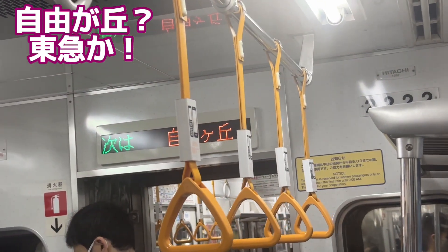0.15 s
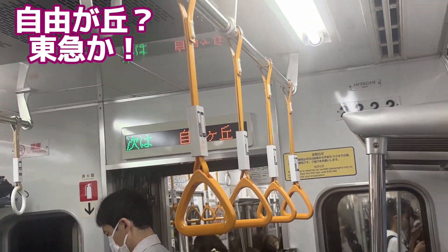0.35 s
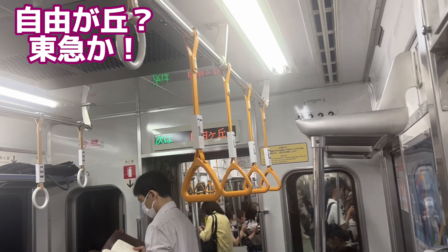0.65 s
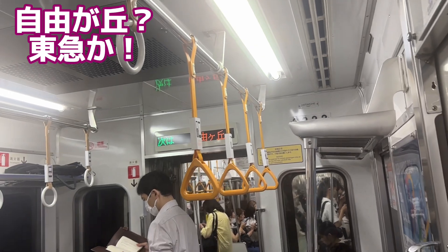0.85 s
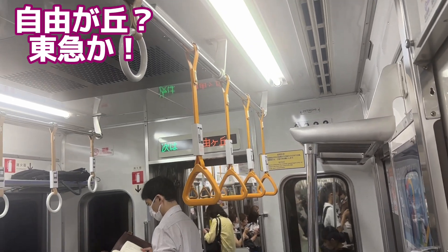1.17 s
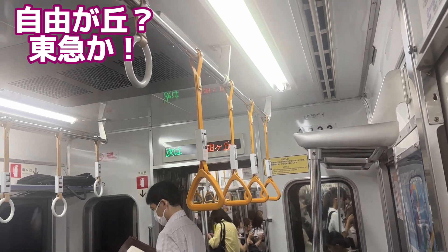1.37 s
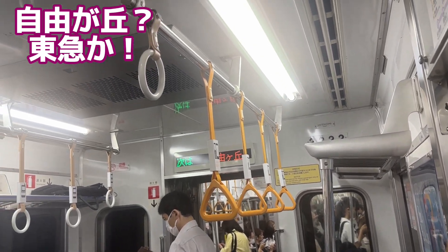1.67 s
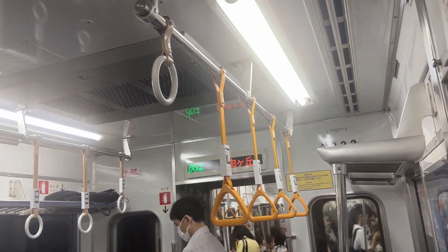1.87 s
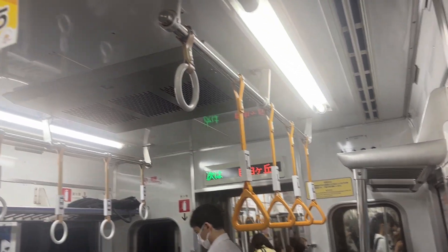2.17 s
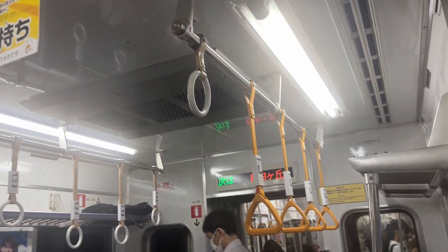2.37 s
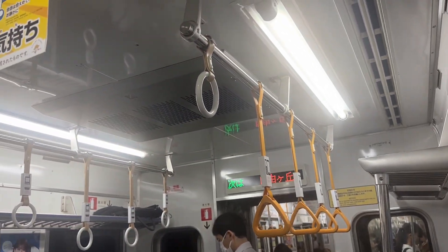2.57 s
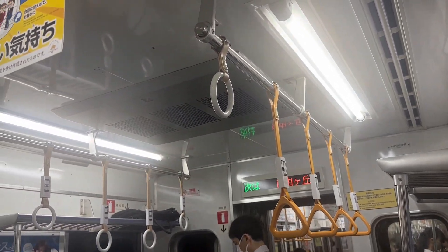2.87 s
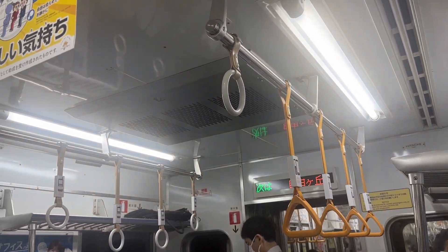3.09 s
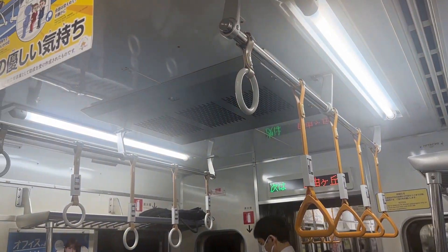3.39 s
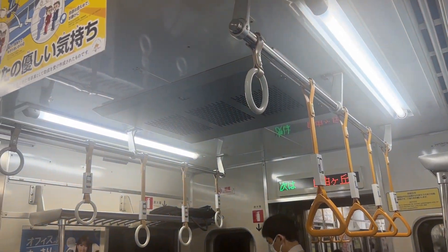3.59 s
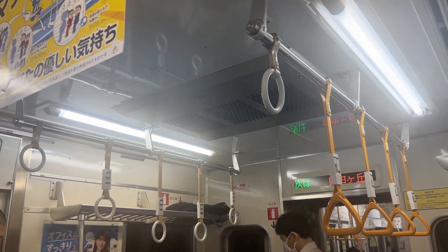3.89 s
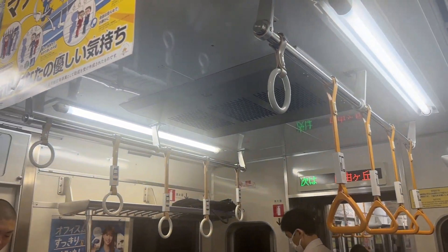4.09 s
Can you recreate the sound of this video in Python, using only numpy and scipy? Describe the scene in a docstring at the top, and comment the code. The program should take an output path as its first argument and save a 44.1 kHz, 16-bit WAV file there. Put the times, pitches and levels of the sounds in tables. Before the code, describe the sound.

Loud train interior in a tunnel: fluttering low wheel howl, rolling steel roar, body boom, faint rising motor whine and fan hum.

```python
"""Inside a subway car that gathers speed in a tunnel: from the start, wheels on rippled rail beat near 300 Hz
with overtones and ringing above, steel rolls with roar and hiss, the body rumbles and booms, motors and gears
whine on rising lines, and fans hum and rush. Near 0.1 s a valve lets out a puff of air; steel scuffs follow
(0.3 to 2.7 s), the howl's octave sings out (0.7 to 2.8 s) and a loose fitting ticks (1.0 to 1.7 s).
The howl flares and dips, and eases after 2.5 s on smoother track. Noise is shaped by resonance or colour."""
import sys
import numpy as np
from scipy import signal
from scipy.fft import rfft, irfft
from scipy.io import wavfile
from scipy.ndimage import uniform_filter1d

SR = 44100
rng = np.random.default_rng(int(sys.argv[2]) if len(sys.argv) > 2 else 0)


def int16_out(signal):
    """Quantize to a 16-bit WAV file."""
    q = np.round(np.clip(np.atleast_2d(signal).T, -1, 1) * 32767)
    wavfile.write(sys.argv[1], SR, q.astype(np.int16))


N = 186984


def from_db(db):
    """Level to amplitude: 20 dB is a factor of ten."""
    return 10 ** (np.asarray(db) / 20)


def rms_one(x):
    """Normalisation to unit root-mean-square amplitude."""
    return x / np.sqrt(np.mean(x ** 2) + 1e-20)


def seconds():
    """Uniform sampling: the time of each sample."""
    return np.arange(N) / SR


def bins():
    """Discrete Fourier analysis: the frequency of each bin, at least 1 Hz."""
    return np.maximum(np.arange(N // 2 + 1) * SR / N, 1)


def in_time(rows):
    """Linear interpolation of a level curve at every sample."""
    s, level_db = np.transpose(rows)
    return np.interp(seconds(), s, level_db)


def in_pitch(rows):
    """Interpolation of each column of a spectrum on a log-frequency axis."""
    hz, *columns = np.transpose(rows)
    return [np.interp(np.log(bins()), np.log(hz), column) for column in columns]


def swell(s, half_s):
    """Gaussian envelope: a rise and fall around a moment, with standard deviation half_s."""
    return np.exp(-((seconds() - s) / half_s) ** 2 / 2)


def swells_db(rows):
    """Superposition of brief level changes."""
    return sum(db * swell(s, half_s) for s, half_s, db in rows)


def resonances(modes):
    """Modal response: steep-sided resonances add in power."""
    f = bins()
    power = 0
    for hz, width_hz, db in modes:
        detuning = (f * f - hz * hz) / (f * width_hz)
        power = power + (from_db(db) / (1 + detuning ** 2)) ** 2
    return np.sqrt(power)


def drift(rate_hz):
    """Low-pass filtered chance (two equal poles) of unit spread, made at every 40th sample."""
    step, settling = 40, 2000
    pole = np.exp(-2 * np.pi * rate_hz * step / SR)
    chance = rng.standard_normal(N // step + settling + 2)
    slow = signal.lfilter([1], [1, -2 * pole, pole * pole], chance)[settling:]
    return np.interp(np.arange(N) / step, np.arange(len(slow)), rms_one(slow))


def at_ports(spectra):
    """Spatial coherence: two unrelated spectra become a field, alike at both ports or diffuse by frequency."""
    # Sound field at the two ports: f/Hz, likeness/1, left-right level difference/dB, left phase lead/rad
    field = [(30, .92, .3, .14), (58, .995, .5, .16), (120, .99, .7, .18), (200, .96, 1.2, .15),
             (260, .97, .6, .19), (305, .95, -.3, .22), (355, .93, .1, .08), (410, .73, .3, -.13),
             (470, .44, 3, -.55), (546, .08, 5, -1.5), (625, .2, 7.5, -1.4), (700, .38, 7, -2.4),
             (790, .52, 7, -2.4), (920, .45, 5, -1.6), (1140, .36, 4, -1.2), (1530, .31, 4, -1.2),
             (2100, .45, 4, 0), (2900, .33, 3, .4), (3900, .2, 3, .3), (5300, .3, 6.5, .2),
             (6800, .3, 5, 1), (8200, .65, 2.5, 2.6), (8900, .4, 1.5, 1.5), (9600, .8, -.2, .25),
             (12000, .97, -.3, 0)]
    alike, balance_db, lead = in_pitch(field)
    alike = np.clip(alike, 0, 1)
    shared, own = spectra * np.sqrt([1 + alike, 1 - alike])
    left = (shared + own) * from_db(balance_db / 2)
    right = (shared - own) * from_db(-balance_db / 2) * np.exp(-1j * lead)
    return rms_one(irfft(np.array([left, right]), N))


def cabin_noise(gain):
    """Random vibration: a Gaussian spectrum of given colour, heard at both ports with unit rms."""
    real, imaginary = rng.standard_normal((2, 2, N // 2 + 1))
    return at_ports((real + 1j * imaginary) * gain)


def tone(hz):
    """Frequency modulation: a unit-rms sine whose phase is the running sum of its frequency."""
    return np.sqrt(2) * np.sin(2 * np.pi * (np.cumsum(hz) / SR + rng.random()))


def cabin_tone(hz, waver_hz, rate):
    """Random frequency modulation: two independently wavering tones feed the field at the ports."""
    pair = np.array([tone(hz + waver_hz * drift(rate)) for port in range(2)])
    return at_ports(rfft(pair * signal.windows.tukey(N, .01)))


def sustained(x, span_s):
    """Power levelling: the mean power over span_s stays steady while quicker beating remains."""
    power = uniform_filter1d(np.mean(x ** 2, axis=0), max(int(span_s * SR), 1))
    return x / np.sqrt(power + 1e-12)


def wandering(x):
    """Variable-speed reading: wheel slip makes the pitch stray up and down."""
    WANDER_PERCENT, WANDER_RATE_HZ = 1.0, 3
    speed = 1 + WANDER_PERCENT / 100 * drift(WANDER_RATE_HZ)
    place = np.cumsum(speed) % (N - 1)
    return np.array([np.interp(place, np.arange(N), port) for port in x])


def through_floor(x):
    """Band-pass transmission: the floor passes only the band in which the wheels howl."""
    LOW_HZ, HIGH_HZ = 228, 430
    f = bins()
    return irfft(rfft(x) / np.sqrt(1 + (LOW_HZ / f) ** 20 + (f / HIGH_HZ) ** 20), N)


def rail_howl():
    """Beating: many wheels on rippled rail sound around one wavering note; in a flare one wheel takes over."""
    # Depth of the rail ripple, as relative howl level: t/s, level/dB
    ripple = [(0, -13.5), (0.25, -17), (0.6, -17.5), (1.1, -15.5), (1.45, -16.5), (1.7, -15), (1.95, -16.5),
              (2.25, -18), (2.5, -15.2), (2.95, -19.5), (3.4, -21.5), (3.9, -24), (4.24, -24.5)]
    # Brief dips of the howl: t/s, half length/s, level change/dB
    lulls = [(0.09, 0.0098, -5), (.18, .006, -10), (.293, .008, -3.5), (0.903, .007, -5),
             (0.955, 0.009, -6.5), (1.274, 0.017, -5), (1.74, 0.0048, -3), (2, 0.0079, -3.5),
             (2.123, 0.0045, -10), (2.455, 0.0059, -5.5), (2.635, 0.01, -7.5), (2.878, 0.0084, -7),
             (2.934, 0.013, -6.5), (3.056, 0.0066, -10), (3.203, 0.017, -4), (3.963, 0.0084, -7)]
    # Resonances of the howl: f/Hz, width/Hz, relative level/dB
    howl_modes = [(268.7, 37.5, 0.5), (299, 33, -6), (341.7, 49, 0), (400.2, 11, -14.5)]
    # Flares on short patches of deeper ripple: t/s, level against the howl/dB, half length/s, f/Hz
    flares = [(0.044, 0.5, 0.012, 285.5), (0.133, 3, 0.0082, 312.6), (0.163, 5.5, 0.0041, 322),
              (0.212, 5.5, 0.0048, 310), (0.241, 3, 0.014, 299), (0.332, 7.5, 0.0048, 289.3),
              (0.536, 5, 0.0083, 276.5), (0.643, 5, 0.01, 305), (0.708, 5, 0.0053, 272),
              (0.816, 2, 0.0085, 314.7), (0.854, 6, 0.0048, 308), (0.926, 7, 0.0056, 300.3),
              (0.994, 7, 0.0067, 300), (1.042, 6.5, 0.0081, 288), (1.181, 8.5, 0.0074, 311.7),
              (1.203, 7.5, 0.0041, 319), (1.23, 9.5, 0.004, 274.3), (1.318, 9.5, 0.0048, 291.3),
              (1.394, 5.5, 0.0057, 271), (1.517, 4, 0.0051, 341), (1.653, 10.5, 0.0058, 301),
              (1.692, 4, 0.012, 292), (1.76, 6.5, 0.012, 291), (1.832, 2.5, 0.01, 284.3),
              (1.902, 5.5, 0.0038, 300), (1.927, 3.5, 0.0063, 305), (1.969, 7, 0.0031, 299),
              (2.163, 6, 0.0043, 305.6), (2.22, 6, 0.0034, 305), (2.398, 10, 0.008, 283),
              (2.432, 6, 0.0047, 300.7), (2.49, 3.5, 0.013, 305), (2.557, 5, 0.012, 306.8),
              (2.606, 4.5, 0.0076, 312), (2.707, 7.5, 0.006, 310.2), (2.757, 4, 0.0047, 317),
              (2.848, 5.5, 0.0056, 316.5), (2.903, 7.5, 0.0061, 307.5), (3.041, 9.5, 0.0044, 305),
              (3.101, 2.5, 0.011, 310.2), (3.171, 4.5, 0.01, 298), (3.315, 5.5, 0.0065, 320),
              (3.374, 9.5, 0.0031, 320), (3.644, 7, 0.0058, 311.5), (4.012, 5, 0.0053, 287)]
    HOWL_DB, FLUTTER_DB, FLUTTER_RATE_HZ = 1, 0.52, 4  # offset to the ripple curve; spread of the flutter
    NOTE_HZ, NOTE_DB = 307.5, -8.5  # level against the resonant noise at mean ripple
    NOTE_FOLLOWS = 0.27  # dB of note per dB of ripple

    ripple_db = in_time(ripple)
    howl_db = HOWL_DB + ripple_db + swells_db(lulls) - FLUTTER_DB * drift(FLUTTER_RATE_HZ)
    note_db = NOTE_DB + NOTE_FOLLOWS * (ripple_db - ripple_db.mean()) + 2.0 * drift(38)
    note = from_db(note_db) * cabin_tone(NOTE_HZ, waver_hz=6.976, rate=9.6)
    resonant_noise = sustained(wandering(cabin_noise(resonances(howl_modes))), span_s=0.1)
    # level the steady howl over 30 ms, so that the flares and dips stand out
    wheels = sustained(resonant_noise + note, span_s=.03)
    for s, db, half_s, hz in flares:
        share = swell(s, half_s)
        wheels = wheels * (1 - share ** 2) + from_db(db) * share * tone(np.full(N, hz))
    return through_floor(from_db(howl_db) * wheels)


def howl_overtones():
    """Resonance above the fundamental: a bed of weaker modes, from which the howl's octave at times sings out."""
    # Weaker overtones of the howl: f/Hz, width/Hz, relative level/dB
    overtone_modes = [(552, 41, -4), (616, 58, -1), (684.4, 46, -4), (754, 71, -11)]
    # Level of the overtone bed: t/s, level/dB
    overtone_level = [(0, -35.5), (.55, -35.5), (.95, -34.5), (1.35, -35), (1.62, -34.5), (2.05, -34.5),
                      (2.38, -33), (2.78, -33.5), (3.0, -37.5), (3.4, -36.5), (3.53, -45.5), (3.85, -37.5),
                      (4.02, -44), (4.24, -39.5)]
    # Octave tones: t/s, half length/s, level/dB, f/Hz
    octave_swells = [(.68, .035, -34, 622), (1.19, .04, -35.5, 623), (1.47, .018, -35, 612),
                     (1.61, .022, -32.5, 630), (1.74, .02, -36, 636), (2.22, .02, -31.5, 613),
                     (2.37, .022, -30.5, 626), (2.51, .018, -34.5, 615), (2.77, .045, -37, 616)]
    bed = sustained(wandering(cabin_noise(resonances(overtone_modes))), span_s=0.19)
    octave = sum(from_db(db) * swell(s, half_s) * cabin_tone(hz, waver_hz=3, rate=12)
                 for s, half_s, db, hz in octave_swells)
    return from_db(in_time(overtone_level)) * bed + octave


def wheel_ring():
    """Modal ringing: noise through the wheels' higher resonances follows a level curve."""
    # Higher resonances of the wheels: f/Hz, width/Hz, relative level/dB
    wheel_modes = [(856, 44, 1), (926.5, 84, 0.5), (1182, 170, -8.5), (1453, 190, -12.5)]
    # Level of the ringing: t/s, level/dB
    ring_level = [(0, -52), (.2, -43), (.55, -42.5), (.72, -46), (1.0, -41), (1.32, -43.5), (1.43, -39),
                  (1.7, -41.5), (2.05, -40), (2.23, -46), (2.38, -38.5), (2.75, -42.5), (3.08, -47.5),
                  (3.3, -45), (3.9, -49), (4.24, -46)]
    ringing = sustained(wandering(cabin_noise(resonances(wheel_modes))), span_s=0.4)
    return from_db(in_time(ring_level)) * ringing


def rolling():
    """Rough-contact excitation: steel rolling on steel gives broadband roar and hiss."""
    # Roughness of the track, as relative roar level: t/s, level/dB
    roughness = [(0, -44.5), (0.45, -45), (0.8, -45), (1.08, -44.5), (1.3, -45), (1.65, -44), (2.17, -45),
                 (2.7, -43), (3.08, -47), (3.38, -45.5), (3.95, -48), (4.24, -47)]
    # Colour of wheels rolling in the tunnel: f/Hz, relative level per Hz/dB
    roar_colour = [(200, -7), (450, 7), (720, 1), (810, -4.5), (1050, -4.5), (1400, -8), (1750, -13),
                   (2250, -12.5), (2750, -18.5), (3150, -19), (3600, -26.5), (4600, -31.5), (9000, -60)]
    # Level of the hiss: t/s, level/dB
    hiss_level = [(0, -62), (.65, -60.5), (1.1, -59), (1.55, -59.5), (2.2, -60), (2.4, -59.5), (2.7, -59.5),
                  (3.05, -62.5), (3.4, -62), (3.9, -64), (4.24, -62)]
    # Colour of the steel and air hiss: f/Hz, relative level per Hz/dB
    hiss_colour = [(2000, -12.5), (3900, 3), (4500, -2), (5100, 1), (5850, 0.5), (6150, -2.5), (6700, 1),
                   (7500, -1.5), (8400, -3.5), (9500, -3.5), (10500, -2.5), (11800, -13), (13900, -15),
                   (15700, -23.5)]
    ROAR_DB = 7.5  # offset to the roughness curve
    f = bins()
    bass_cut = f ** 2 / (f ** 2 + 40 ** 2)
    roar_db = in_time(roughness) + ROAR_DB + 1.2 * drift(21)
    roar = from_db(roar_db) * cabin_noise(from_db(in_pitch(roar_colour)[0]) * bass_cut)
    hiss_db = in_time(hiss_level) + 0.67 * drift(25)
    hiss = from_db(hiss_db) * cabin_noise(from_db(in_pitch(hiss_colour)[0]))
    return roar + hiss


def car_body():
    """Panel resonance: floor and walls rumble in their modes over one deep boom."""
    # Resonances of the car body: f/Hz, width/Hz, relative level/dB
    body_modes = [(33, 26, -24.5), (76.5, 33, -6), (118, 22, -0.5), (135.1, 15, 1), (157.7, 30, 0.5),
                  (184.6, 39, -2), (221.6, 26, 4)]
    # Shaking of the car body, as relative rumble level: t/s, level/dB
    shake = [(0, -22), (0.65, -28.5), (1.0, -28), (1.45, -24.5), (2.0, -29), (2.5, -29), (2.85, -27.5),
             (3.15, -30.5), (3.42, -27.5), (3.9, -31.5), (4.24, -29.5)]
    # Lurches that make the rumble surge or sink: t/s, half length/s, level change/dB
    lurches = [(0.08, 0.028, -8), (0.173, .022, -1), (0.5, .025, 4.5), (0.832, 0.038, 5.5), (.98, .022, 6),
               (1.1, .025, 4), (1.196, 0.027, -5.5), (1.28, 0.034, 3.5), (1.64, 0.035, 3), (1.74, 0.019, 6),
               (2.37, .025, 4), (2.55, 0.022, 3.5), (3.183, 0.022, -1.5)]
    # Level of the deep boom: t/s, level/dB
    boom_level = [(0, -43.5), (0.9, -33.5), (1.9, -34), (2.1, -38.5), (2.35, -34), (3.2, -48.5),
                  (3.55, -41.5), (3.8, -44.5), (4.24, -38)]
    RUMBLE_DB, BOOM_HZ = -0.87, 56.8  # offset to the shake curve; pitch of the boom
    rumble_db = in_time(shake) + swells_db(lurches) + RUMBLE_DB
    rumble = from_db(rumble_db) * sustained(cabin_noise(resonances(body_modes)), span_s=0.08)
    boom_db = in_time(boom_level) + .7 * drift(5.6)
    boom = from_db(boom_db) * cabin_tone(BOOM_HZ, waver_hz=0.23, rate=6.6)
    return rumble + boom


def drive_whine():
    """Order tracking: lines at fixed ratios climb with speed; tunnel reflections make each shimmer by port."""
    # Lines of motors and gears: ratio to the base pitch/1, relative level/dB, fade/(dB/s)
    whine_orders = [(6.97, 2.5, 2.0), (8.93, -1.5, .6), (13.95, -4.5, 1.6), (15.9, -10, 1.2),
                    (16.01, -7, 1.3), (20.9, -12, 1.8)]
    # One line stands out for a while: t/s, half length/s, gain/dB, ratio of the line/1
    whine_swells = [(.3, .25, 3.5, 6.97), (2.7, .11, 7, 6.97), (1.05, .12, 3.5, 8.93), (2.95, .08, 3, 8.93),
                    (3.7, .1, 6.5, 8.93), (1.2, .17, 3, 13.95), (2.5, .1, 4, 13.95), (3.55, .15, 4, 13.95),
                    (.1, .11, 5, 16.01)]
    BASE_HZ, RISE_HZ_PER_S, WAVER_HZ = 349.3, 6.1, .3  # base pitch at the start, its rise and its waver
    WHINE_DB, SCATTER = -68, 0.79  # common level; reflections against the direct sound
    t = seconds()
    base_hz = BASE_HZ + RISE_HZ_PER_S * t
    out = np.zeros((2, N))
    for ratio, db, fade in whine_orders:
        phase = 2 * np.pi * np.cumsum(ratio * (base_hz + WAVER_HZ * drift(8.8))) / SR
        gain_db = swells_db([(s, half_s, up) for s, half_s, up, line in whine_swells if line == ratio])
        line_db = WHINE_DB + db - fade * t + gain_db
        for port, side_db in enumerate((2.0, -2.0)):
            reflected = drift(9.6) * np.cos(phase) + drift(7.9) * np.sin(phase)
            direct = np.cos(phase + 2 * np.pi * rng.random())
            out[port] += from_db(line_db + side_db) * (direct + SCATTER * reflected)
    return out


def ventilation():
    """Tonal and broadband fan noise: the ceiling fans hum and rush whatever the track does."""
    # Hum of the fans: f/Hz, level/dB
    fan_hum = [(41.5, -54.5), (94, -46.5)]
    # Colour of the rush: f/Hz, width/Hz, relative level/dB
    rush_modes = [(412, 100, 1.5), (497, 92, -9.5), (716, 280, -8)]
    RUSH_DB = -40
    hum = sum(from_db(db + 1.3 * drift(4.1)) * tone(hz + .5 * drift(2.1)) for hz, db in fan_hum)
    return hum + from_db(RUSH_DB) * cabin_noise(resonances(rush_modes))


def air_puff():
    """Jet noise: compressed air leaves a valve in a brief bright burst with a rough whistle."""
    # Envelope and jet level of the puff: t/s, half length/s, level/dB
    puff = (.1, 0.052, -57)
    # Colour of the jet: f/Hz, relative level per Hz/dB
    puff_colour = [(3000, -18.5), (4500, -2.5), (4780, 4.5), (5100, 1), (5650, 1), (6200, -4), (7100, 0.5),
                   (8500, -15.5), (10200, -4), (11700, -12), (13500, -10), (15700, -22.5)]
    WHISTLE_HZ, WHISTLE_DB, WAVER_HZ = 4740, -65, 35
    s, half_s, jet_db = puff
    jet = from_db(jet_db) * cabin_noise(from_db(in_pitch(puff_colour)[0]))
    whistle = from_db(WHISTLE_DB) * cabin_tone(WHISTLE_HZ, waver_hz=WAVER_HZ, rate=30)
    return swell(s, half_s) * (jet + whistle)


def scuffs():
    """Sliding friction: wheels rub on the rail for a moment, as band-shaped bursts of one noise."""
    # Scuffs: t/s, half length/s, level/dB, centre f/Hz, width/Hz
    scuff_events = [(.33, .22, -65, 6110, 3500), (0.45, 0.14, -56, 2420, 1000),
                    (1.136, 0.058, -67.5, 4990, 2510), (2.035, 0.043, -47.5, 2200, 1196),
                    (2.012, 0.031, -62, 4850, 3300), (2.365, 0.029, -59, 3840, 2510),
                    (2.68, 0.079, -54, 2390, 1510)]
    rubbing = rfft(cabin_noise(1))
    out = np.zeros((2, N))
    for s, half_s, db, hz, width_hz in scuff_events:
        band = irfft(rubbing * resonances([(hz, width_hz, 0)]), N)
        out += from_db(db) * swell(s, half_s) * rms_one(band)
    return out


def fittings():
    """Free decay: a small loose metal fitting to the left ticks as a sum of dying modes."""
    # Ticks: t/s, level/dB
    ticks = [(1.03, -62), (1.1, -61), (1.168, -59), (1.692, -55.5)]
    # Modes of the fitting: f/Hz, relative level/dB, 60 dB decay time/s
    fitting_modes = [(5180, -3.5, 0.089), (5320, -7, .06), (5840, -7.5, .06), (7200, -8.5, 0.07),
                     (7480, -10, .05)]
    PAN_DB = 12  # left against right
    out = np.zeros(N)
    for s, db in ticks:
        age = np.maximum(seconds() - s, 0)
        for hz, mode_db, t60 in fitting_modes:
            decay_db = -60 * np.minimum(age / t60, 2)
            out += from_db(db + mode_db + decay_db) * np.sin(2 * np.pi * hz * age)
    return out * from_db([[PAN_DB / 2], [-PAN_DB / 2]])


def scene():
    """Superposition: all sources add at the two ports."""
    wheels = rail_howl() + howl_overtones() + wheel_ring() + rolling()
    moments = scuffs() + air_puff() + fittings()
    return wheels + moments + car_body() + drive_whine() + ventilation()


def record(dry):
    """Elliptic low-pass filtering: the top is cut steeply."""
    CUTOFF_HZ = 15700
    return signal.sosfilt(signal.ellip(10, .1, 80, CUTOFF_HZ, fs=SR, output="sos"), dry)


dry = scene()
out = record(dry)
int16_out(out)
```